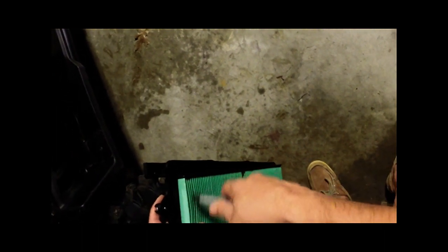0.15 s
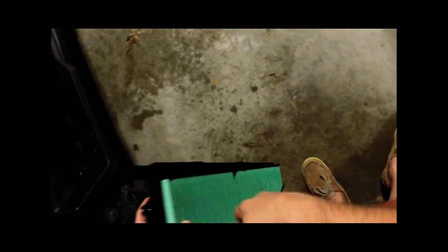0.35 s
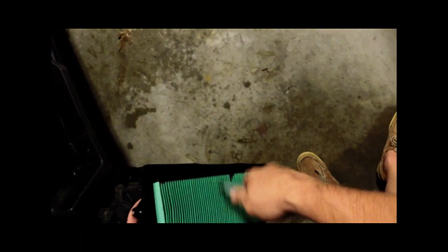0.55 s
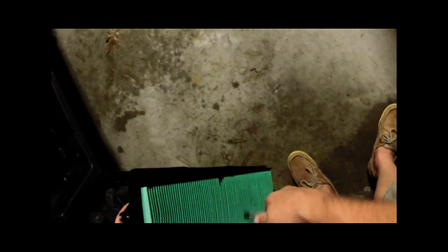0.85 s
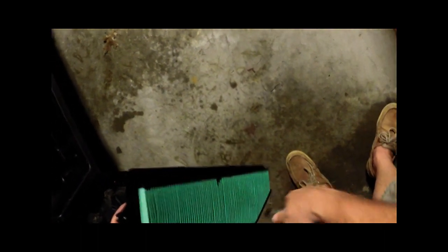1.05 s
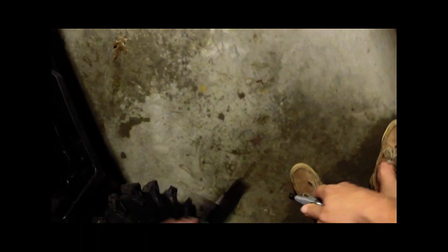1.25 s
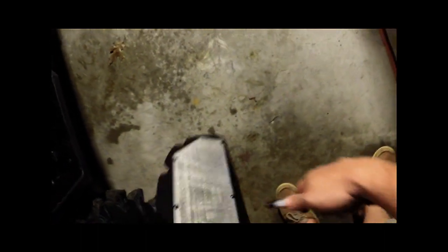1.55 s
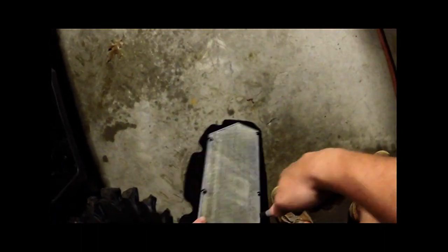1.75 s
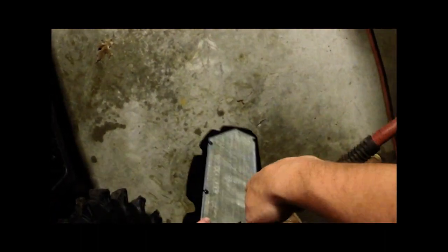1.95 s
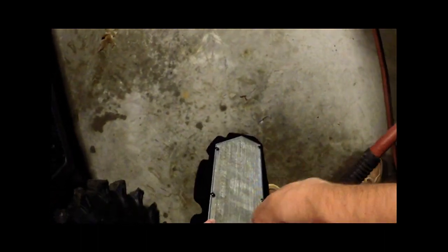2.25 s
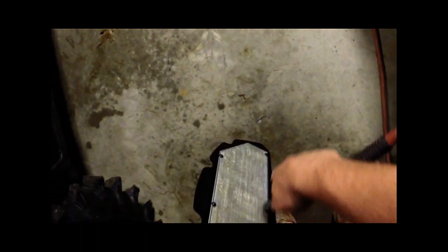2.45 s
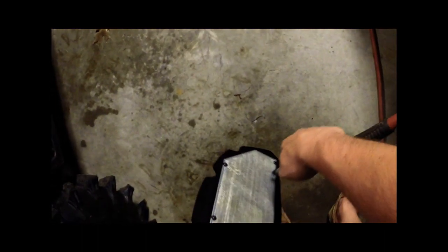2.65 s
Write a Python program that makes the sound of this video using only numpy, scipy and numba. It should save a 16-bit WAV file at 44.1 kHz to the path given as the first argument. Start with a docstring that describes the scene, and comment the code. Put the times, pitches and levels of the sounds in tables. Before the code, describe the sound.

Close, bright rush of compressed air whistling noisily across filter pleats, with a brief paper flutter; the trigger is released, quiet garage tone remains, then the jet rises in pitch and resumes. Mono pickup, reverberant room.

```python
"""In a garage, a compressed-air gun blows through a pleated paper filter, close to a mono microphone.
The jet is coloured noise; the nozzle and the pleats are noise-driven resonances that ring and colour the rush.
The trigger is let go, the room rings out, and the trigger is squeezed again: first the nozzle, then the full jet.
A short paper flutter, a scuff, a hoot and a draught are bell-shaped bursts of noise over quiet room noise."""
import sys
import numpy as np
from scipy import signal
from scipy.fft import rfft, irfft
from scipy.io import wavfile
from scipy.ndimage import uniform_filter1d
from numba import njit

SR = 44100
rng = np.random.default_rng(int(sys.argv[2]) if len(sys.argv) > 2 else 0)


def generate_wav(sig):
    """Save sig (samples, or channels by samples) to the path in sys.argv[1] as 16-bit PCM at SR."""
    pcm = np.round(np.clip(np.atleast_2d(sig).T, -1, 1) * 32767).astype(np.int16)
    wavfile.write(sys.argv[1], SR, pcm)


N = 123479

# first and second blast, before the trims: (time [s], treble hiss [dB], nozzle band [dB], rush in the pleats [dB])
FIRST_BLAST = [(0.0, -28.5, -18, -26.5), (0.09, -25, -23, -28.5), (0.17, -27.5, -16, -29.5),
               (0.28, -27.5, -22.0, -27.5), (0.46, -26.5, -18, -27.5), (0.56, -23.5, -26, -23),
               (0.66, -27.0, -22.0, -29.5), (0.73, -27.5, -21, -30), (0.82, -25.5, -27, -26.5),
               (0.92, -28, -17.5, -30), (1.02, -26.5, -23.5, -27.5), (1.1, -26, -18, -30.5)]
SECOND_BLAST = [(1.87, -25.5, -18, -29), (1.92, -23, -22, -27.5), (2.07, -25.5, -18, -33.5),
                (2.13, -26.5, -25, -28), (2.23, -27, -21, -30.5), (2.29, -23, -17.5, -31.5),
                (2.34, -28, -28, -39), (2.4, -26, -17.5, -40.5), (2.49, -27.5, -26, -33.5),
                (2.56, -26.5, -19.5, -32.5), (2.7, -26, -26.5, -29.5), (2.8, -26, -26, -27.5)]
# spectrum of the jet turbulence: (frequency [Hz], relative density [dB per Hz])
JET_SPECTRUM = [(100, -35), (300, -22), (600, -9.5), (1200, -3.5), (3000, 0.5), (4500, 3), (7500, 0.5),
                (9000, -2), (10600, -2.5), (12300, -7.3), (13700, -7), (14600, -12.5), (15400, -9)]
# In all resonance tables the width is that of each of two equal passes, and the level is relative.
# upper resonances of the nozzle: (frequency [Hz], width [Hz], level [dB])
NOZZLE_MODES = [(5526, 260, -6), (6180, 940, 1), (6860, 900, 0)]
# low resonances of the nozzle: (frequency [Hz], width [Hz], level [dB])
THROAT_MODES = [(1894, 480, -3.5), (2182, 550, 3), (2470, 500, -8)]
# level of the low nozzle resonances: (time [s], level [dB])
THROAT_CURVE = [(0, -25.5), (.15, -20), (.26, -26), (.35, -27), (.5, -30), (.6, -24), (.73, -33),
                (.83, -25), (.95, -33.5), (1.03, -26), (1.1, -41.5), (1.87, -27.5), (2.05, -23.5),
                (2.22, -31.5), (2.29, -26.5), (2.34, -38), (2.42, -25.5), (2.6, -31), (2.8, -30)]
# resonances of the pleats and the frame: (frequency [Hz], width [Hz], level [dB])
PLEAT_MODES = [(364, 294, -12.5), (579, 190, -8), (822, 140, -9), (980, 70, -5.5), (1168, 446, 1.5),
               (1666, 880, -6), (3055, 190, -3)]
# tones of the jet on the pleat edges: (frequency [Hz], width [Hz], level [dB])
EDGE_MODES = [(4156, 275, 3.5), (4590, 380, 3), (4870, 150, 1)]
# level of the edge tones, before the trim: (time [s], level [dB])
EDGE_CURVE = [(0, -24.5), (.2, -26.5), (.38, -25), (.43, -22), (.56, -20), (.72, -26.5), (.85, -20.5),
              (.93, -30), (1.02, -20.5), (1.1, -25), (1.87, -22.5), (1.96, -17), (2.17, -25), (2.29, -18),
              (2.34, -33), (2.54, -23), (2.65, -33), (2.8, -26)]
# spectrum of the garage background: (frequency [Hz], relative density [dB per Hz])
BACKGROUND_SPECTRUM = [(20, -5.5), (50, -1.5), (110, -3.5), (200, -6.5), (500, -12), (1000, -18),
                       (2000, -23.5), (3600, -25), (4300, -24), (5200, -32.5), (7000, -36.5), (9000, -40.5),
                       (15000, -55.5)]
# spectrum of the paper flutter: (frequency [Hz], relative density [dB per Hz])
FLUTTER_SPECTRUM = [(150, -23), (500, -15), (900, 8), (1500, -5.5), (3200, 3.5), (5000, -14), (8000, -30.5),
                    (11000, -19.5), (15000, -29)]

# trigger: released, then squeezed again; the valve jumps part open as it leaves its seat
RELEASE_S, CLOSE_DB_PER_S = 1.09, 189
SQUEEZE_S, OPEN_S, UNSEAT_OPENING = 1.7157, 0.15, 0.099
# amplitude follows the valve opening to these powers
JET_POWER, NOZZLE_POWER, THROAT_POWER, PLEAT_POWER = 3, 1.58, 1.36, 1.82
NOZZLE_SAG = 0.074  # share by which the upper nozzle band would lie lower at zero opening
JET_TRIM_DB, NOZZLE_TRIM_DB, EDGE_TRIM_DB = 6.5, -0.5, -1.5  # added to the level curves
# spread and random steps per second of each mode's level; spread of its centre as a share
FLICKER_DB, FLICKER_STEPS_HZ, WANDER = 0.5, 22.07, 0.0079
# room: reverb level against the direct sound, decay times, treble split, gap before the reflections
ROOM_DB, ROOM_T60_S, ROOM_TREBLE_T60_S, ROOM_SPLIT_HZ, ROOM_DELAY_S = -4.5, 0.54, 0.46, 6500, 0.0032
SWEEP_SHARE = 0.71  # power share of the reflections that change as the nozzle moves
BACKGROUND_DB, RUMBLE_SWAY_DB, RUMBLE_STEPS_HZ = -49, 1.5, 8.74
# bursts: centre and spread of the bell in time, tuning where there is one, level at the peak
FLUTTER_S, FLUTTER_SPREAD_S, FLUTTER_DB = 0.583, 0.024, -16.5
SCUFF_S, SCUFF_SPREAD_S, SCUFF_HZ, SCUFF_WIDTH_HZ, SCUFF_DB = 1.662, 0.03, 833.33, 720, -49
HOOT_S, HOOT_SPREAD_S, HOOT_HZ, HOOT_WIDTH_HZ, HOOT_DB = 1.866, 0.017, 318, 60, -36
PUFF_S, PUFF_SPREAD_S, PUFF_HZ, PUFF_WIDTH_HZ, PUFF_DB = 2.135, 0.04, 29, 25, -43.5
TOP_HZ = 15300  # upper limit of the recorder


def undb(db):
    """Decibels to gain."""
    return 10 ** (np.asarray(db) / 20)


def unit(x):
    """Scale to rms 1."""
    return x / np.sqrt(np.mean(x ** 2))


def clock():
    """Time of each sample in seconds."""
    return np.arange(N) / SR


def curve(points):
    """Draw a straight-line curve through (time, level) points."""
    times, levels = np.array(points).T
    return np.interp(clock(), times, levels)


def walk(rate):
    """Smooth random drift of rms 1: held random steps, averaged twice."""
    hold = max(int(SR / rate), 2)
    steps = np.repeat(rng.standard_normal(N // hold + 1), hold)
    smooth = uniform_filter1d(uniform_filter1d(steps, hold), hold)
    return unit(smooth[:N])


def swell(at, spread):
    """A bell-shaped rise and fall."""
    return np.exp(-0.5 * ((clock() - at) / spread) ** 2)


def coloured(points):
    """Noise shaped by a spectrum, drawn straight over log frequency."""
    hz, db = np.array(points).T
    bins = np.maximum(np.fft.rfftfreq(N, 1 / SR), 1)
    gain = undb(np.interp(np.log(bins), np.log(hz), db))
    return unit(irfft(rfft(rng.standard_normal(N)) * gain, N))


@njit
def bandpass(x, g, k):
    """State-variable band-pass with a moving centre."""
    y, band, low = np.empty(len(x)), 0., 0.
    for i in range(len(x)):
        v = (band + g[i] * (x[i] - low)) / (1 + g[i] * (g[i] + k))
        band, low, y[i] = 2 * v - band, low + 2 * g[i] * v, k * v
    return y


def resonance(hz, width_hz, bend=1):
    """Turbulence ringing in one steep resonance, two band-passes deep, whose centre wanders."""
    g = np.tan(np.pi * hz * bend * (1 + WANDER * walk(6)) / SR)
    once = bandpass(rng.standard_normal(N), g, width_hz / hz)
    return unit(bandpass(once, g, width_hz / hz))


def blown(modes, bend=1):
    """A set of air-driven resonances, each flickering on its own."""
    total = 0
    for hz, width_hz, db in modes:
        level = undb(db + FLICKER_DB * walk(FLICKER_STEPS_HZ))
        total = total + level * resonance(hz, width_hz, bend)
    return unit(total)


def valve():
    """Opening 0-1 as the finger squeezes, and the quick fade of the flow on release."""
    t = clock()
    before = t < SQUEEZE_S
    ramp = UNSEAT_OPENING + (1 - UNSEAT_OPENING) * (t - SQUEEZE_S) / OPEN_S
    opening = np.where(before, 1, np.clip(ramp, 0, 1))
    shutting = undb(-CLOSE_DB_PER_S * np.maximum(t - RELEASE_S, 0) * before)
    return opening, shutting


def jet(opening, hiss_db):
    """Turbulent hiss of the free jet, which grows most steeply with the valve opening."""
    return undb(JET_TRIM_DB + hiss_db) * opening ** JET_POWER * coloured(JET_SPECTRUM)


def nozzle(opening, nozzle_db):
    """Air ringing the nozzle: an upper band that rises in pitch as the valve opens, and a low band."""
    bend = 1 - NOZZLE_SAG * (1 - opening)
    upper = undb(NOZZLE_TRIM_DB + nozzle_db) * opening ** NOZZLE_POWER * blown(NOZZLE_MODES, bend)
    throat = undb(curve(THROAT_CURVE)) * opening ** THROAT_POWER * blown(THROAT_MODES)
    return upper + throat


def pleats(opening, pleat_db):
    """The rush resonating in pleats and frame, with noisy tones where the jet meets the pleat edges."""
    rush = undb(pleat_db) * blown(PLEAT_MODES)
    edges = undb(EDGE_TRIM_DB + curve(EDGE_CURVE)) * blown(EDGE_MODES)
    return opening ** PLEAT_POWER * (rush + edges)


def air_gun():
    """Jet, nozzle and pleats, all fed by one valve."""
    opening, shutting = valve()
    times, *levels = np.array(list(FIRST_BLAST) + list(SECOND_BLAST)).T
    hiss_db, nozzle_db, pleat_db = (np.interp(clock(), times, db) for db in levels)
    return shutting * (jet(opening, hiss_db) + nozzle(opening, nozzle_db) + pleats(opening, pleat_db))


def room_tail():
    """One diffuse response of the garage; its treble dies sooner."""
    t = np.arange(SR // 2) / SR
    noise = rng.standard_normal(len(t))
    low = signal.sosfiltfilt(signal.butter(2, ROOM_SPLIT_HZ, fs=SR, output="sos"), noise)
    low_fade = np.exp(-np.log(1000) * t / ROOM_T60_S)
    treble_fade = np.exp(-np.log(1000) * t / ROOM_TREBLE_T60_S)
    tail = (low * low_fade + (noise - low) * treble_fade) * (t > ROOM_DELAY_S)
    return tail / np.linalg.norm(tail)


def garage(x, count=16):
    """Direct sound plus steady reflections and others that crossfade from one nozzle position to the next."""
    lead = SR // 4
    sound = np.concatenate([x[lead:0:-1], x])  # a reversed lead-in has the room ringing at the start
    place = np.linspace(0, count - 1, len(sound))
    steady = signal.fftconvolve(sound, room_tail())
    moving = 0
    for k in range(count):
        nearness = np.cos(np.pi / 2 * np.clip(place - k, -1, 1))
        moving = moving + signal.fftconvolve(sound * nearness, room_tail())
    wet = np.sqrt(SWEEP_SHARE) * moving + np.sqrt(1 - SWEEP_SHARE) * steady
    return (x + undb(ROOM_DB) * wet[lead:lead + N]) / np.hypot(1, undb(ROOM_DB))


def background():
    """Low room noise whose rumble below about 250 Hz sways in level."""
    noise = coloured(BACKGROUND_SPECTRUM)
    rumble = signal.sosfiltfilt(signal.butter(2, 250, fs=SR, output="sos"), noise)
    sway = undb(RUMBLE_SWAY_DB * walk(RUMBLE_STEPS_HZ))
    return undb(BACKGROUND_DB) * (noise + rumble * (sway - 1))


def flutter():
    """The jet catches the paper and makes it flutter: a short swell of coloured noise."""
    return undb(FLUTTER_DB) * swell(FLUTTER_S, FLUTTER_SPREAD_S) * coloured(FLUTTER_SPECTRUM)


def scuff():
    """A soft, broadly tuned brush of noise as the filter is turned over."""
    return undb(SCUFF_DB) * swell(SCUFF_S, SCUFF_SPREAD_S) * resonance(SCUFF_HZ, SCUFF_WIDTH_HZ)


def hoot():
    """A hollow, narrow resonance of noise as the jet returns."""
    return undb(HOOT_DB) * swell(HOOT_S, HOOT_SPREAD_S) * resonance(HOOT_HZ, HOOT_WIDTH_HZ)


def draught():
    """A very low puff of noise: a draught on the microphone."""
    return undb(PUFF_DB) * swell(PUFF_S, PUFF_SPREAD_S) * resonance(PUFF_HZ, PUFF_WIDTH_HZ)


def scene():
    """Air gun and flutter in the garage, with small dry sounds and room noise, the same on both channels."""
    in_room = garage(air_gun() + flutter())
    mono = in_room + background() + scuff() + hoot() + draught()
    return np.array([mono, mono])


def record(dry):
    """The recorder cuts the top steeply with an elliptic low-pass."""
    return signal.sosfilt(signal.ellip(12, 0.1, 90, TOP_HZ, fs=SR, output="sos"), dry)


dry = scene()
out = record(dry)
generate_wav(out)
```